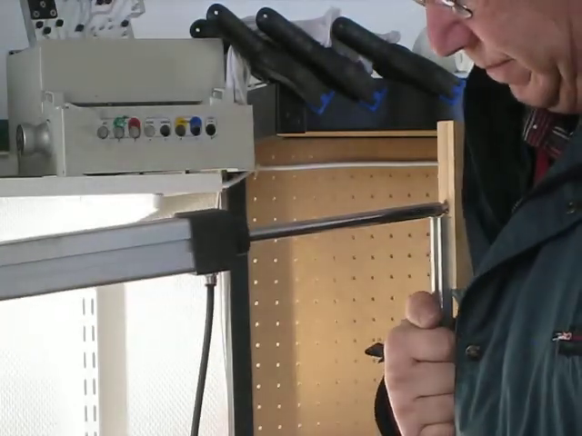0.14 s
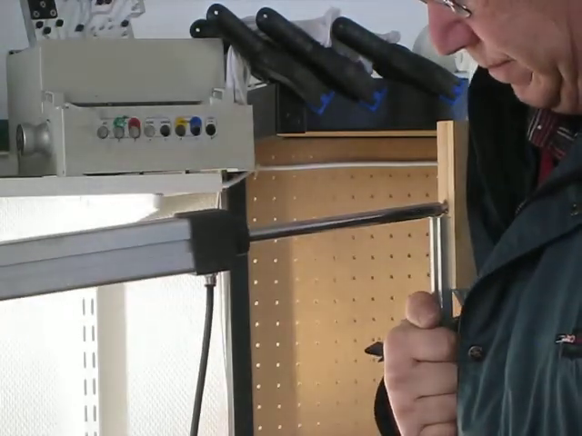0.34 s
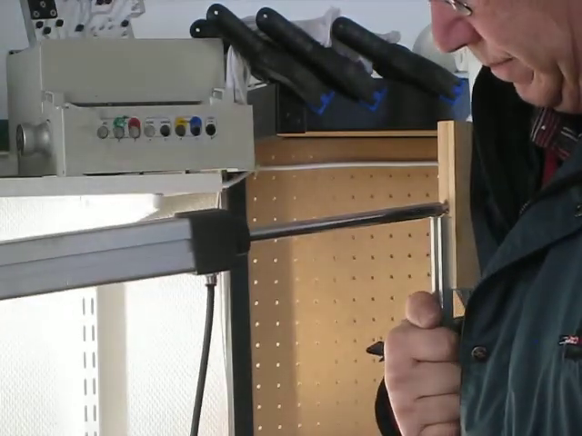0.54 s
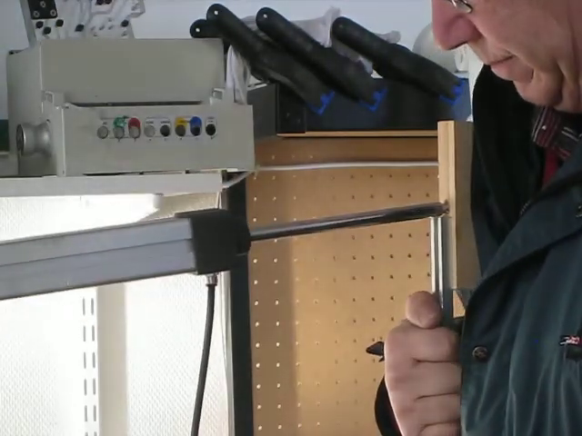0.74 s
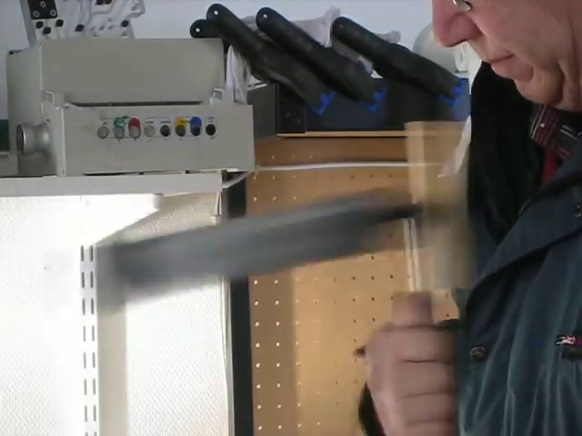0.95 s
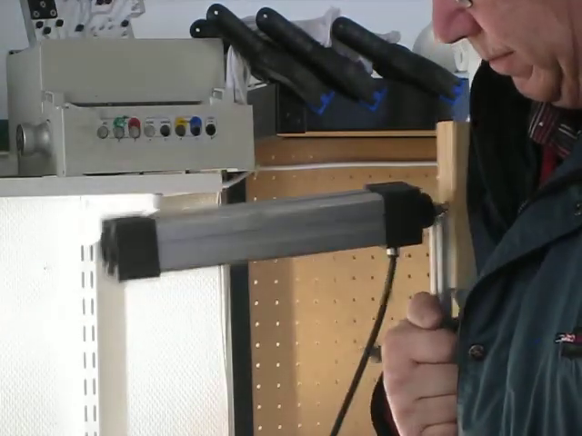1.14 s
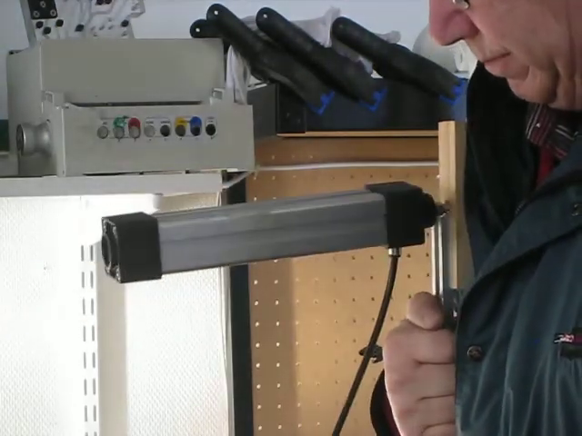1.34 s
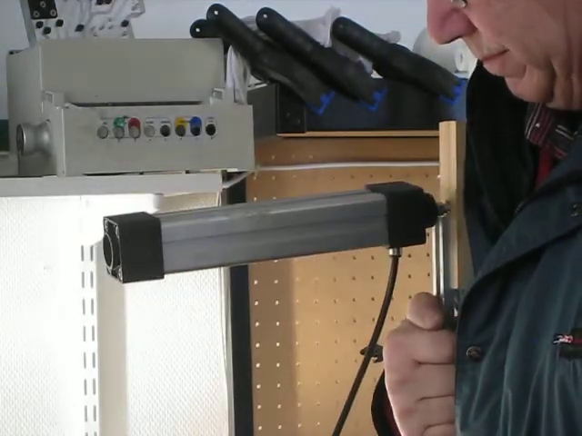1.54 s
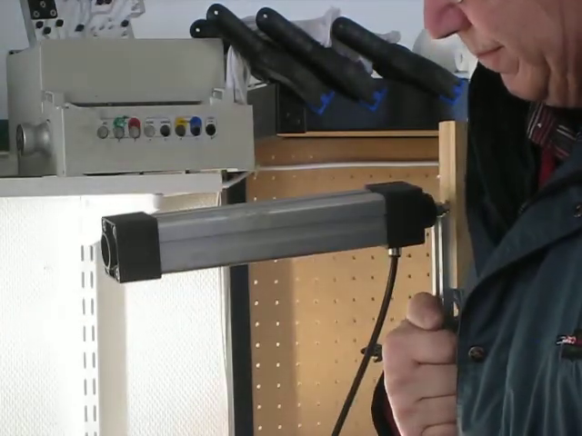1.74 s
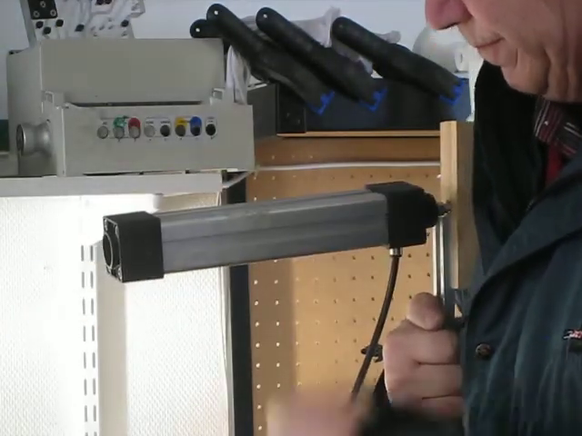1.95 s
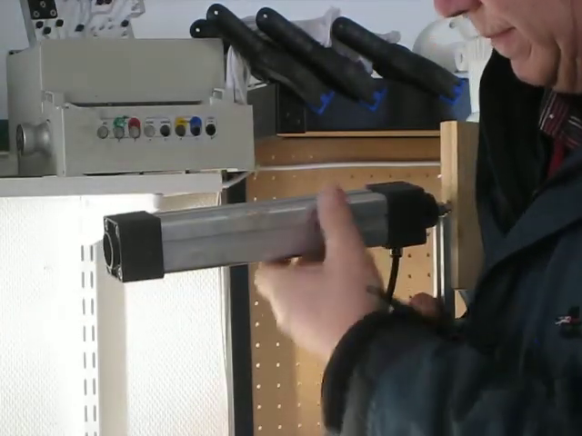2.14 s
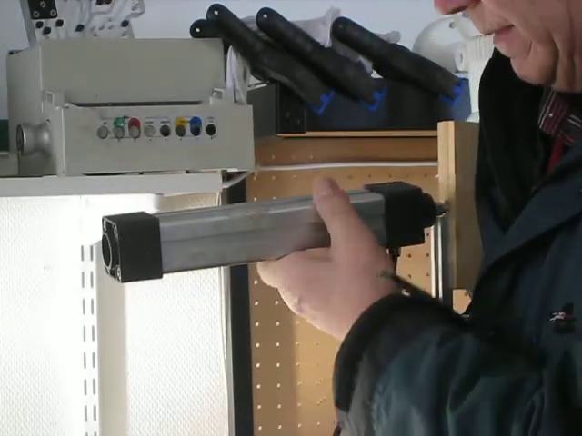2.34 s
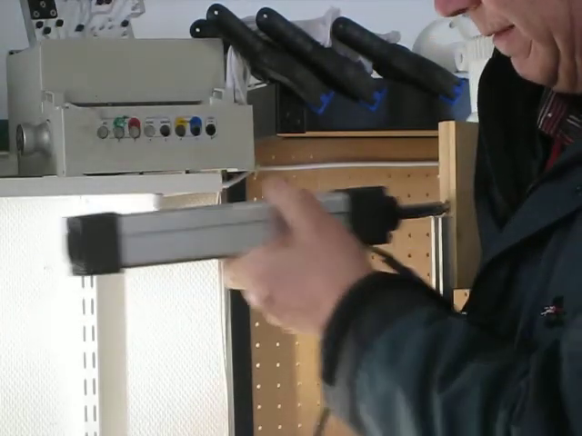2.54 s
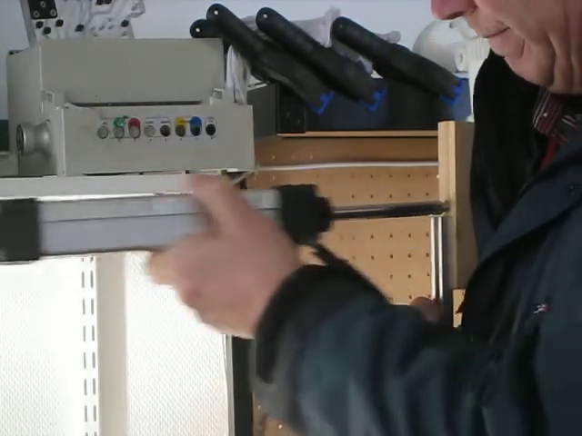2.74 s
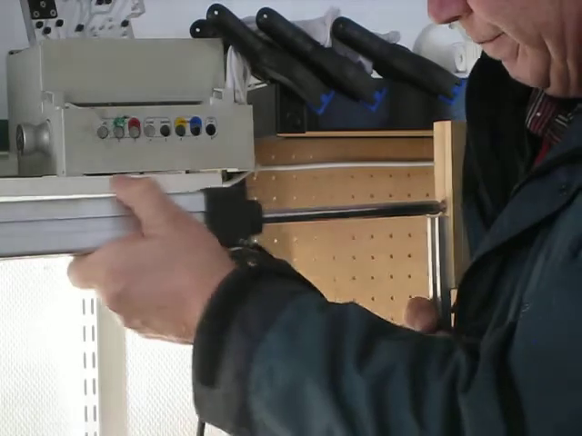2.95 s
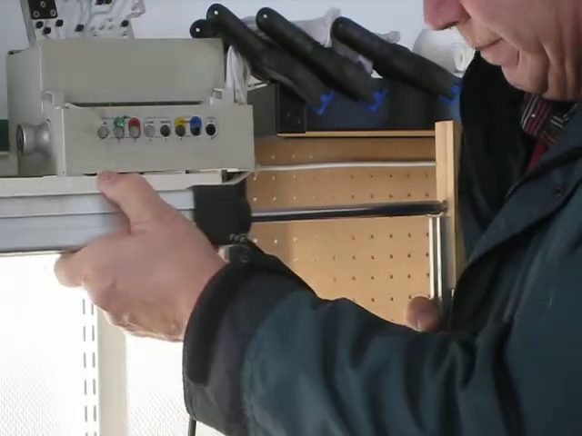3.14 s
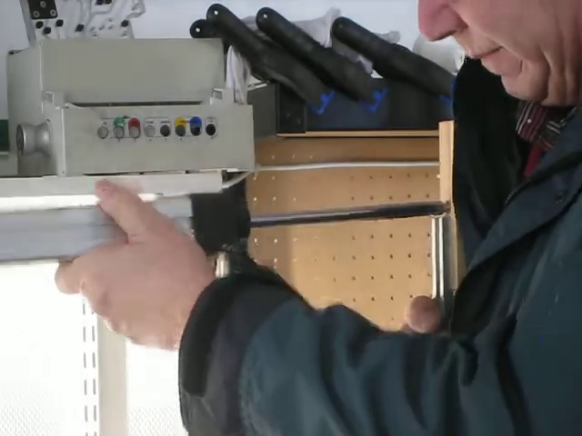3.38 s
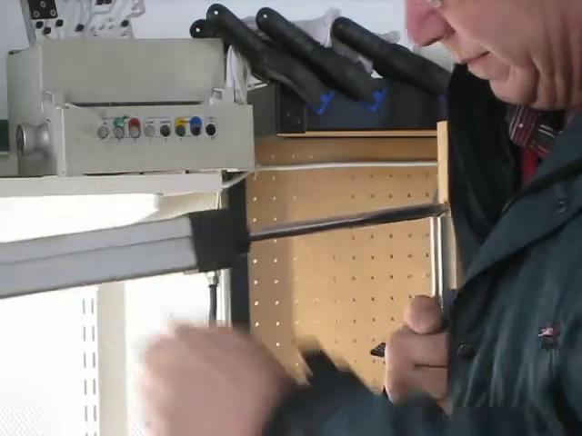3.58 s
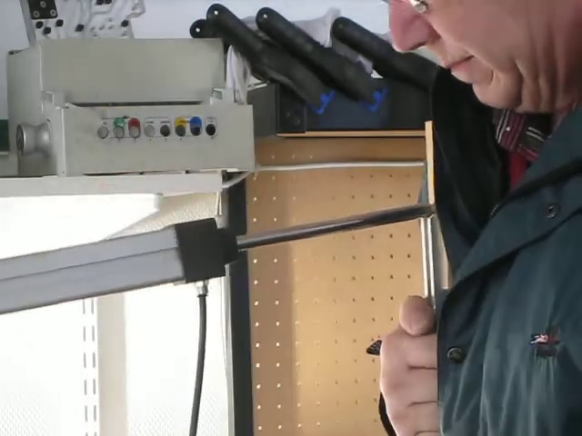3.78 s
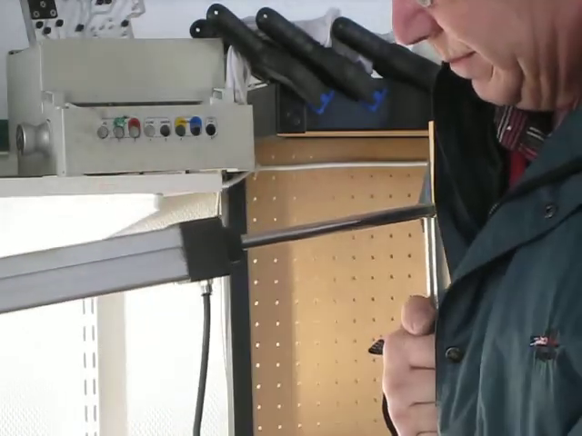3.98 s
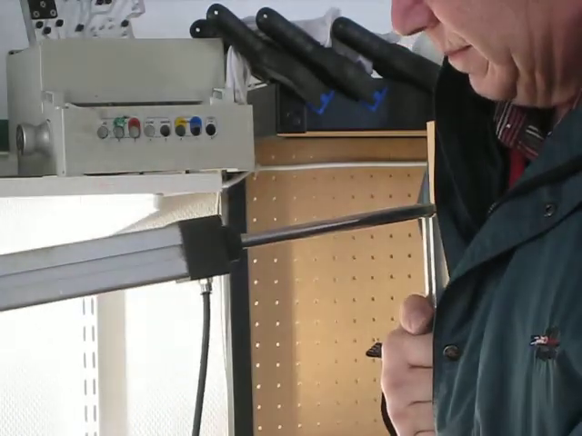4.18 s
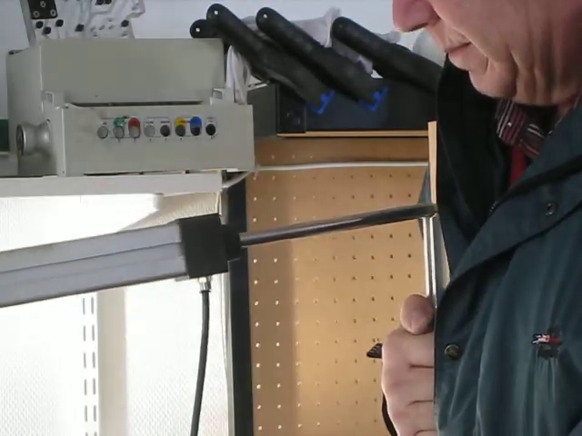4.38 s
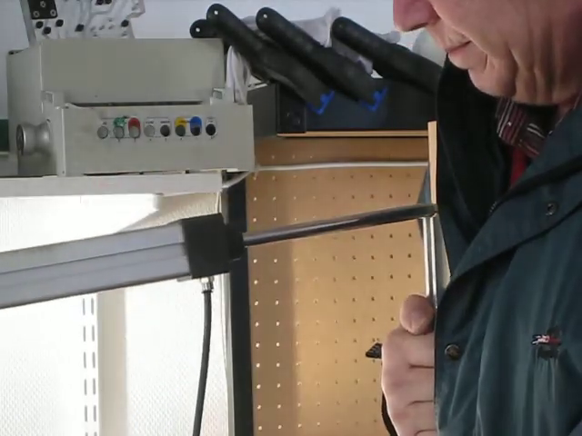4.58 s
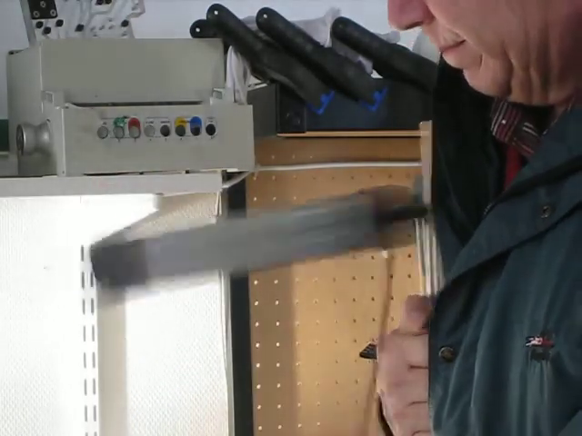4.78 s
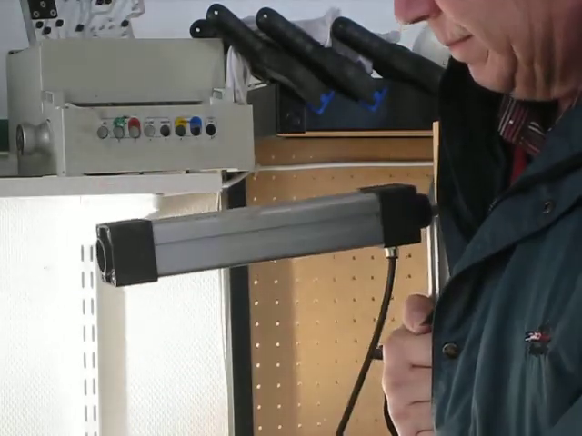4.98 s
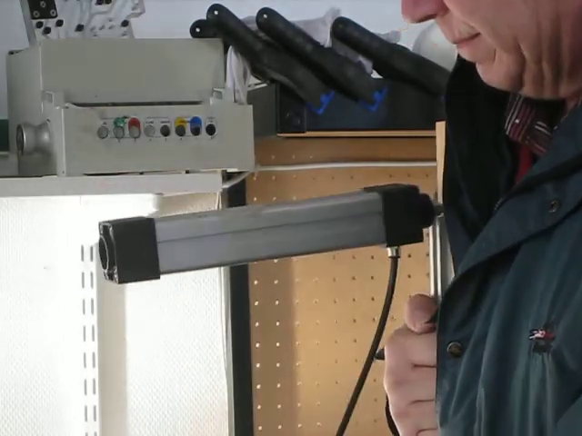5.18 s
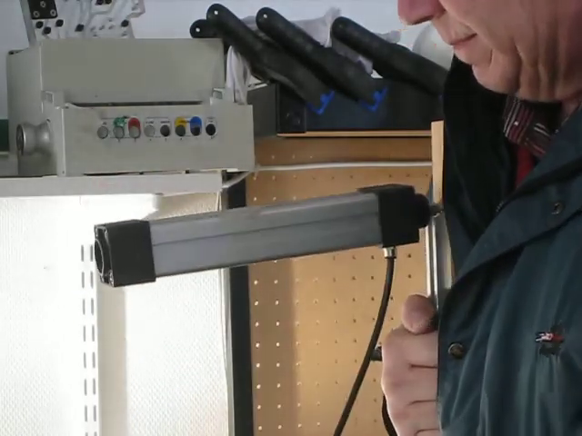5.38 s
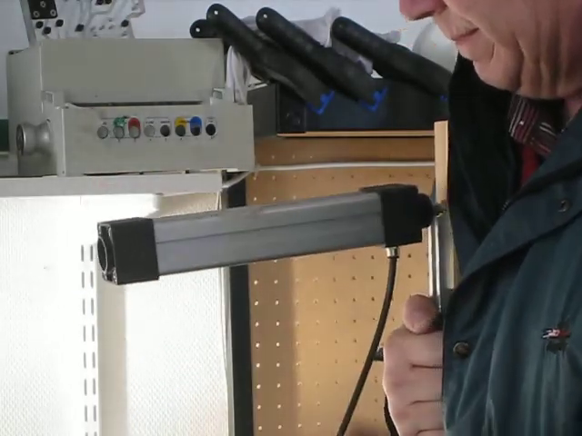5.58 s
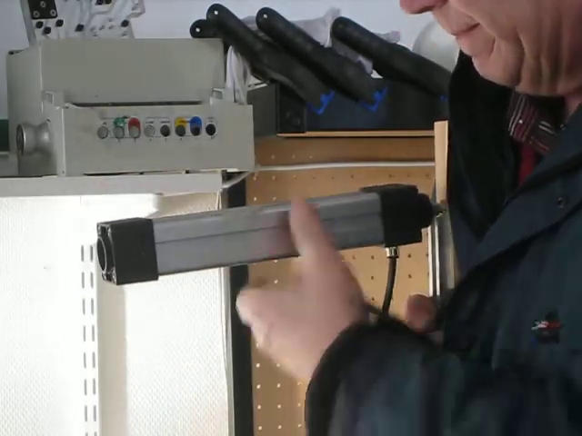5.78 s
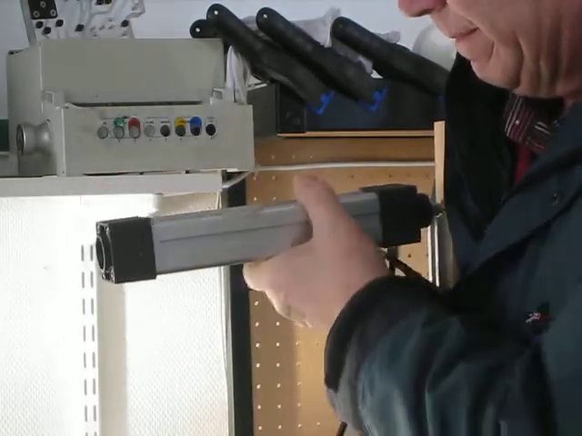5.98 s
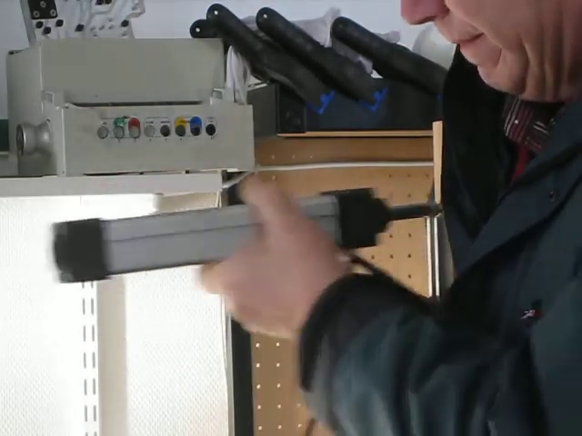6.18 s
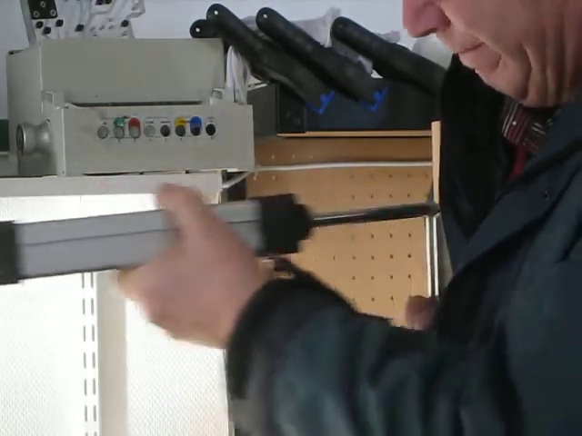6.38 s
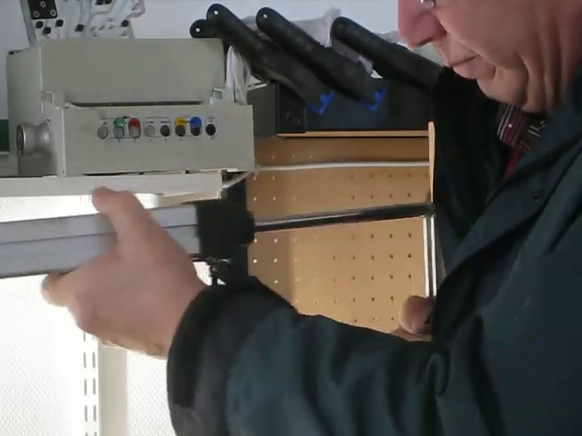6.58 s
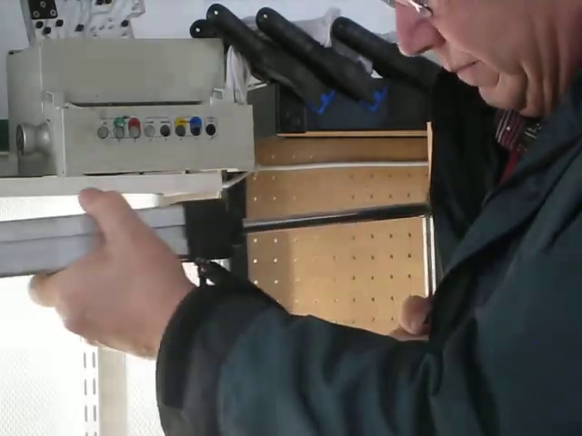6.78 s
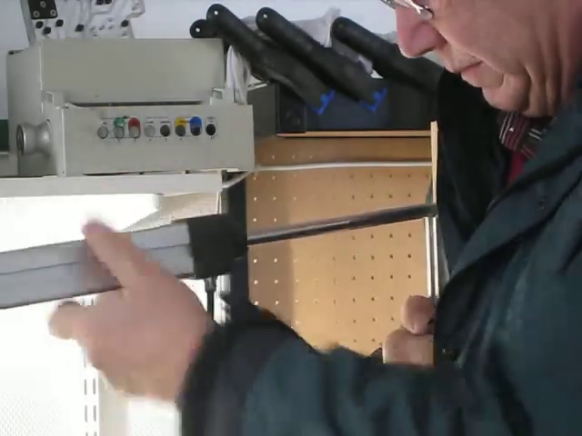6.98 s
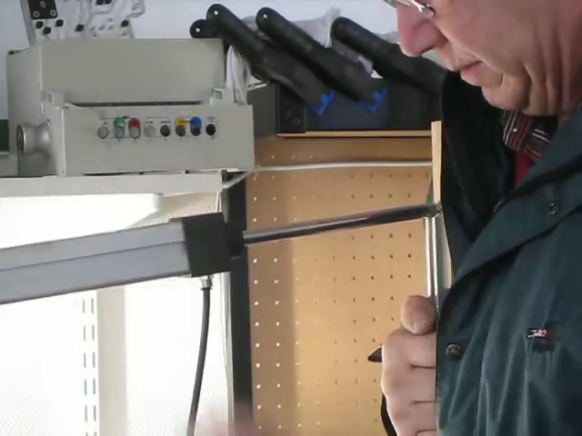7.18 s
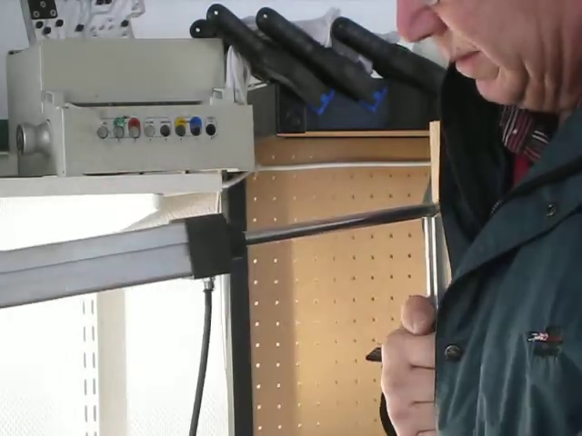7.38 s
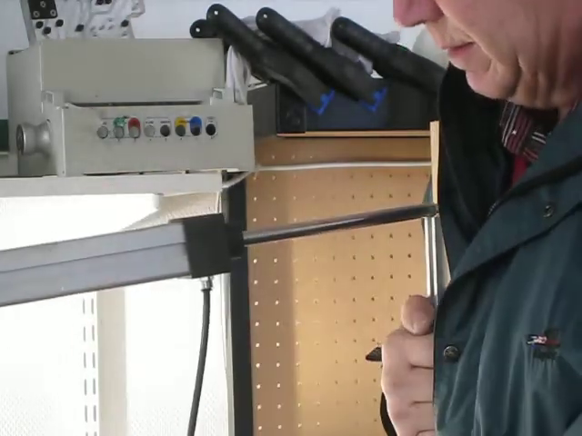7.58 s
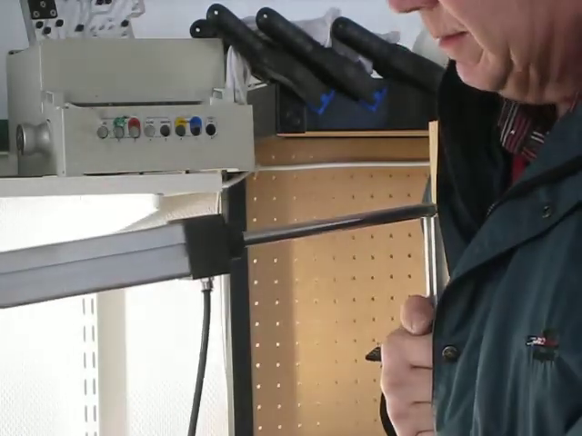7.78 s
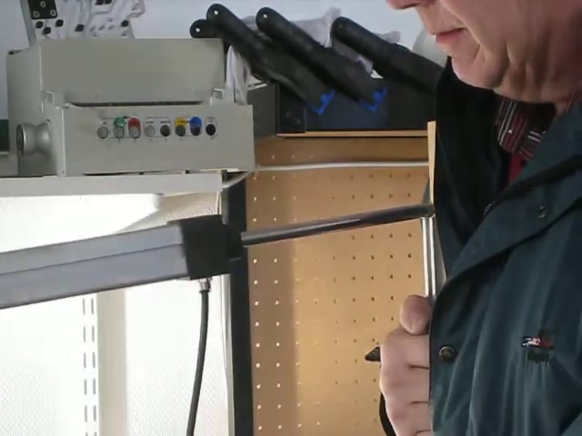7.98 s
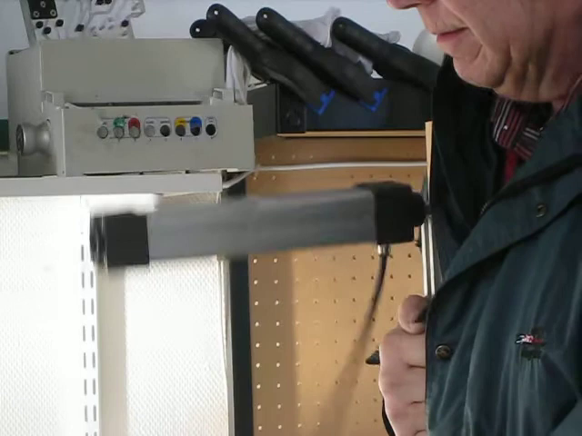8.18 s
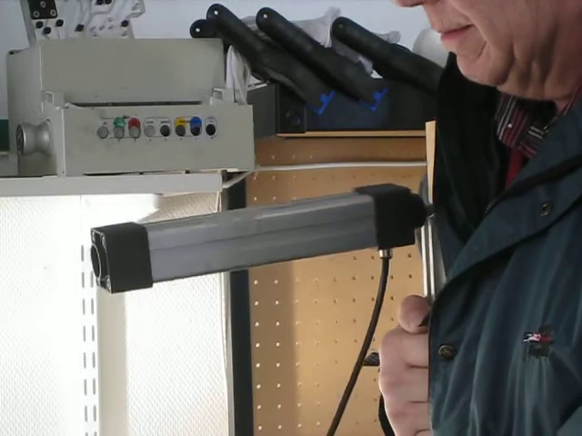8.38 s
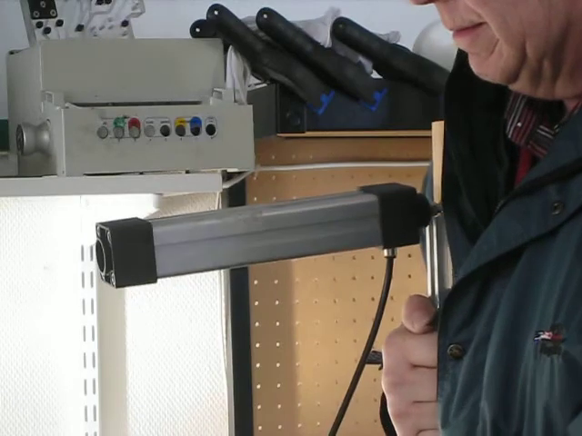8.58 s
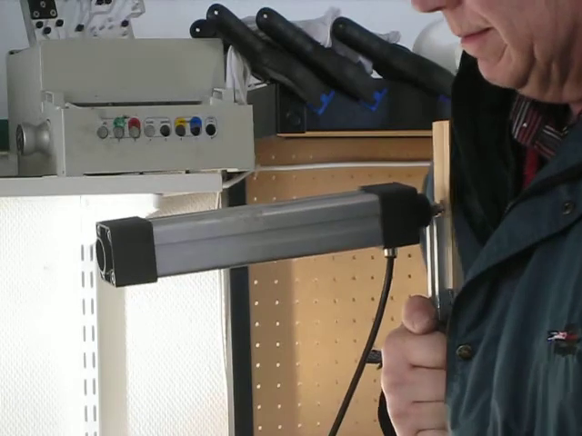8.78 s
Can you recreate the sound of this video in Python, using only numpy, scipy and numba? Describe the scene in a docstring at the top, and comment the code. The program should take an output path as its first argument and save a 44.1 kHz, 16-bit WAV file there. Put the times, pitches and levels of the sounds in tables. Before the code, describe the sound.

Three loud pneumatic strokes, near one microphone in a reverberant workshop: an instant crack and rush of air, a dull rebound, faint whistling, then about half a second later a pop and sharp hiss. Between the first and second, and second and third, cloth rubs, air is sucked quietly through a port, and small parts click. Quiet room air, motor hum and high whine continue underneath, with room sound swelling after each flattened blast.

```python
"""Workshop, one microphone. Three times a valve snaps open, air rushes into a pneumatic cylinder and the piston slams
its end cap; the port whistles as the barrel fills, and the first time the barrel chatters in its bracket.
The valve then dumps the air with a pop and a fading jet, and after the first two exhausts a hand draws the barrel out.
A sleeve rubs close by and small parts knock between strokes; a motor hum, a thin whine and workshop air run throughout.
The recorder's limiter flattens each blast and lets the room swell up behind it."""
import sys
import numpy as np
from scipy import signal
from scipy.fft import rfft, irfft, next_fast_len
from scipy.io import wavfile
from scipy.ndimage import map_coordinates
from numba import njit

SR = 44100
rng = np.random.default_rng(int(sys.argv[2]) if len(sys.argv) > 2 else 0)


def store_wav(level_fs):
    """Save 16-bit WAV to argv[1]."""
    pcm = np.round(np.clip(np.atleast_2d(level_fs), -1, 1) * 32767)
    wavfile.write(sys.argv[1], SR, pcm.T.astype(np.int16))


N = 389455
TIME = np.arange(N) / SR

# All levels below are relative source levels, ahead of the limiter.
# Power strokes: (slam time [s], slam level [dB], frame ring level [dB], valve snap time [s],
# inrush level [dB], inrush full time [s], inrush end time [s], whistle level [dB])
POWER_STROKES = [(0.8993, -2.5, -15, 0.883, -10, 0.91, 1.08, -30),
                 (4.7493, -5.5, -18, 4.7155, -10.5, 4.750, 4.89, -38),
                 (8.0349, -3.5, -12.5, 8.022, -10.5, 8.077, 8.177, -38)]
# Room's answer to piston on end cap: (frequency [Hz], level [dB])
THUD_SPECTRUM = [(40, -55), (90, -23), (140, -13.5), (300, -7.5), (500, -2.5), (680, -0.5), (1050, -2.5),
                 (1400, -6.5), (2000, -9.5), (2800, -13.5), (4000, -20.5), (7000, -16.5), (11000, -18),
                 (15500, -46)]
# Short, dead modes of the end cap: (frequency [Hz], level [dB], T60 [s])
CAP_MODES = [(463, -21.5, 0.067), (798, -5.5, 0.034), (1130, 2, 0.0099), (1373, -5.5, 0.024),
             (2066, -4, 0.0089), (4210, -35, 0.0031), (4880, -7, 0.011)]
# Modes of barrel and mount: (frequency [Hz], level [dB])
FRAME_MODES = [(140, -15.5), (222, -8), (421, 2.5), (612, 0.5), (659, 0.5), (722, -4), (799, 2), (852, -2),
               (897, -13), (1028, -10), (1093, -1), (1275, 2)]
# Air rushing into the barrel: (frequency [Hz], level [dB])
INRUSH_SPECTRUM = [(60, -58), (300, -8), (1500, -3), (2600, -3), (3800, -5), (6000, -3.5), (8000, -1.5),
                   (10500, -6.5), (12800, -8), (15500, -13)]
# Edge tones of the filling port: (multiple of the lowest tone [ratio], level [dB])
WHISTLE_TONES = [(1, -46), (1.009, -47), (1.072, -50), (1.189, -55)]
# Lowest whistle tone of each stroke: (frequency [Hz])
WHISTLE_PITCHES = [6350, 6900, 6430]
# Mount chattering as the barrel swings out: (time [s], level [dB])
CHATTER_KNOCKS = [(1.21, -33), (1.278, -34.5), (1.315, -33), (1.388, -37), (1.435, -39.5), (1.548, -45),
                  (1.635, -42.5)]
# Ringing bracket: (frequency [Hz], level [dB], T60 [s])
BRACKET_MODES = [(231.7, -15.5, 0.24), (614.4, -4, 0.69), (647, -18, 0.34), (888, -19, .3), (1110, -21, .3),
                 (1244, -11, 0.3)]
# Exhausts: (time [s], pop level [dB], hiss level [dB], time until the barrel is empty [s])
EXHAUST_EVENTS = [(1.698, -8.5, -9.5, .30), (5.342, -8.5, -8.5, .30), (8.7380, -10.5, -6, .30)]
# Pop of the opening exhaust: (frequency [Hz], level [dB])
POP_SPECTRUM = [(60, -8.5), (300, -5), (1200, -3.5), (2200, 7.5), (5000, 10), (7000, -1.5), (15000, -8.5)]
# Exhaust jet at full pressure: (frequency [Hz], level [dB])
JET_SPECTRUM = [(200, -50), (700, -35), (1000, -22), (1600, -12.5), (2300, -6), (3300, -4), (5200, -0.5),
                (7000, -10.5), (8400, -3.5), (10200, -9.5), (13000, -6.5), (15500, -5)]
# Exhaust when nearly empty: (frequency [Hz], level [dB])
SPENT_SPECTRUM = [(60, -27), (500, -23.5), (850, -11), (1200, -5), (2200, -3), (3200, 5), (3900, -0.5),
                  (4600, 3.5), (5400, -2.5), (6600, -16), (8000, -11.5), (10500, -26.5), (14500, -35),
                  (15600, -2)]
# High resonances of the exhaust hose: (frequency [Hz], width [Hz], level [dB])
HOSE_PEAKS = [(8780, 570, 16), (13350, 890, 24)]
# Barrel drawn out by hand: (start time [s], end time [s], suction level [dB])
HAND_DRAWS = [(2.447, 2.916, -45), (6.046, 6.513, -43)]
# Air drawn through the port: (frequency [Hz], level [dB])
PORT_SPECTRUM = [(290, -45), (500, -22), (628, -8), (896, -8), (1110, -3), (2290, -6), (3000, -3),
                 (5860, -14.5), (11000, -15), (15000, -21)]
# Resonances of the port: (frequency [Hz], width [Hz], level [dB])
PORT_RESONANCES = [(1070, 230, 5), (3230, 880, 8), (4600, 490, 6.5)]
# Piston touching its outer stop: (time [s], level [dB])
STOP_TOUCHES = [(2.897, -33), (6.490, -33.5)]
# Tap on the outer stop: (frequency [Hz], level [dB])
STOP_SPECTRUM = [(100, -10), (300, 2.5), (1200, 1.5), (3200, 2.5), (5000, -4), (6300, -1.5), (8500, -13),
                 (10200, 1.5), (11200, -10), (12800, -11), (15500, -17)]
# Mount taking up the stop: (frequency [Hz], level [dB])
THUMP_SPECTRUM = [(100, -23), (230, 0), (500, -5), (1200, -5), (3000, -30)]
# Light knocks of pivot and valve handle: (time [s], level [dB], treble edge [Hz])
LIGHT_KNOCKS = [(1.365, -44, 6000), (3.578, -41.5, 6000), (3.592, -46, 4000), (3.677, -47, 2500),
                (4.06, -43, 2800), (4.491, -44, 2000), (6.70, -43, 500), (7.06, -43, 2500),
                (7.092, -36, 5000), (7.85, -45.5, 1500)]
# Colour of a knock: (frequency [Hz], level [dB])
KNOCK_SPECTRUM = [(60, -24), (300, 5), (900, 4.5), (5000, 1.5), (6500, -16), (15000, -24)]
# Jacket sleeve as the arm reaches, pulls and lets go:
# (time of full speed [s], length [s], folds level [dB], smooth face level [dB])
SLEEVE_SWEEPS = [(2.414, .25, -51.5, -55), (2.83, 0.56, -51, -56), (3.274, 0.24, -50.5, -56),
                 (3.58, 0.56, -51.5, -55.5), (3.917, 0.3, -52, -50.5), (5.844, 0.34, -53, -48),
                 (6.25, 0.24, -64, -61), (6.603, 0.31, -53, -57), (7.08, 0.47, -52.5, -54.5),
                 (7.377, 0.28, -51.5, -52)]
# Rubbing folds of the sleeve: (frequency [Hz], level [dB])
FOLDS_SPECTRUM = [(60, -18), (300, -13), (1000, 4), (3000, -0.5), (6000, -8), (15500, -28)]
# Smooth face of the sleeve: (frequency [Hz], level [dB])
SWISH_SPECTRUM = [(1000, -26), (4000, 0.5), (8000, 0), (15500, -4.5)]
# Decay of the workshop: (frequency [Hz], T60 [s])
ROOM_DECAY = [(100, 0.71), (400, 0.37), (1000, 0.59), (3000, 0.48), (7000, 0.39), (15000, 0.12)]
# Steady hum of the motor: (frequency [Hz], level [dB])
HUM_TONES = [(48.4, -55.5), (99, -70)]
# Skirt of the high whine: (frequency [Hz], level [dB])
WHINE_SKIRT = [(9000, -60), (10300, -22), (10650, -17), (11100, -14), (11250, -21), (11600, -23),
               (12200, -60)]
# Line of the high whine: (frequency [Hz], width [Hz], level [dB])
WHINE_PEAK = [(11283, 70, 18)]
# Workshop air: (frequency [Hz], level [dB])
AIR_SPECTRUM = [(15, -16), (25, -2), (100, -2), (250, 1), (450, 1.5), (750, 1.5), (1100, -2.5),
                (2000, -5.5), (3000, -10), (6000, -13), (10000, -16), (12500, -18), (15500, -24.5)]


def amp(db):
    """Decibels to gain."""
    return 10 ** (np.asarray(db) / 20)


def unit(x):
    """Scales to rms 1."""
    return x / np.sqrt(np.mean(x ** 2) + 1e-20)


def read(points, hz):
    """Reads a spectrum on a log-frequency axis."""
    f, value = np.transpose(points)
    return np.interp(np.log(hz + 1), np.log(f + 1), value)


def colour(x, points, peaks=()):
    """Filters by a spectrum and resonances (Hz, width, dB), keeping the power of a white input."""
    size = next_fast_len(N, True)
    hz = np.fft.rfftfreq(size, 1 / SR)
    db = read(points, hz)
    for f, width, height in peaks:
        db = db + height / (1 + (2 * (hz - f) / width) ** 2)
    return irfft(rfft(x, size) * unit(amp(db)), size)[:N]


def noise(points, peaks=()):
    """Noise of rms 1 with a given spectrum and resonances."""
    return unit(colour(rng.standard_normal(N), points, peaks))


def drift(per_s):
    """Random wander of rms about 1 that forgets its value at the given rate."""
    knots = np.linspace(0, TIME[-1], 4000)
    memory = np.exp(-per_s * knots[1])
    wander = signal.lfilter([1], [1, -memory], rng.standard_normal(len(knots)))
    return np.interp(TIME, knots, unit(wander))


def burst(s, rise, t60):
    """Envelope that starts to rise at s and then dies away."""
    age = np.maximum(TIME - s, 0)
    decay = np.log(1000) * np.maximum(age - rise, 0) / t60
    return np.minimum(age / rise, 1) * np.exp(-np.minimum(decay, 20))


def ring(blows, modes, rise=0.0006):
    """Each blow (s, dB) sets decaying sine modes (Hz, dB, t60) ringing."""
    t = np.arange(SR) / SR
    out = np.zeros(N + SR)
    tone = np.zeros(SR)
    for k, (f, db, t60) in enumerate(modes):
        # neighbouring modes start in opposite polarity
        tone += (-1) ** k * amp(db - 60 * t / t60) * np.sin(2 * np.pi * f * t)
    for s, db in blows:
        out[round(s * SR):][:SR] += amp(db) * tone * np.minimum(t / rise, 1)
    return out[:N]


def room(x, build=0.0062, build_cycles=14):
    """Diffuse workshop tail of energy 1: each band dies at its own speed, and the bass is slow to build up."""
    hz, t, z = signal.stft(rng.standard_normal(SR), SR, nperseg=256)
    rising = np.minimum(t / (build + build_cycles / (hz[:, None] + 30)), 1)
    dying = amp(-60 * t / read(ROOM_DECAY, hz)[:, None])
    tail = signal.istft(z * rising * dying, SR, nperseg=256)[1]
    return signal.fftconvolve(x, tail / np.linalg.norm(tail))[:N]


def slams(cap_db=9, rebound_s=0.00373, rebound_db=15, crack_db=-4, room_db=29, ring_t60=0.45):
    """The piston cracks against the end cap and lands again more dully; frame and room ring on."""
    blows = [(s, db) for s, db, *_ in POWER_STROKES]
    first = signal.lfilter(*signal.butter(2, 350, "high", fs=SR), ring(blows, CAP_MODES))
    dulled = signal.lfilter(*signal.butter(1, 1200, fs=SR), first)
    second = np.interp(TIME - rebound_s, TIME, dulled)
    crack_noise = noise([(200, -35), (1500, 11.5), (5000, -3), (11000, -5.5), (15500, -34)])
    crack = sum(amp(db) * burst(s, 0.00024, 0.041) for s, db in blows) * crack_noise
    direct = amp(cap_db) * first + amp(rebound_db) * second + amp(crack_db) * crack
    # barrel and mount ring on much longer than the cap
    frame_blows = [(s, ring_db) for s, _, ring_db, *_ in POWER_STROKES]
    frame = ring(frame_blows, [(f, db, ring_t60) for f, db in FRAME_MODES], rise=0.0058)
    clicks = np.zeros(N)
    for s, db in blows:
        clicks[round(s * SR)] = amp(db)
    return direct + frame + amp(room_db) * room(colour(clicks, THUD_SPECTRUM))


def inrush(snap_db=-33, swell_db=28, fall_db_per_s=95, room_db=-4, flutter_db=3.5, onset_offset=.012):
    """The valve snaps open, the flow swells, then fades as the barrel fills and the port starts to whistle."""
    valve_s, settle_s = 0.011, .1  # valve opening, settling of the filled barrel
    gap_open, gap_filled, gap_left = 0.79, .22, 0.056  # pressure across the port [share of supply]
    lead_s, whistle_rise_s, whistle_t60, offset_decay_s = .03, 0.016, 0.46, 0.01205
    flow, snap, edge, lowest_hz = np.zeros((4, N))
    for (*_, opens, db, full, ends, whistle_db), whistle_hz in zip(POWER_STROKES, WHISTLE_PITCHES):
        shape_db = np.interp(TIME, [opens, full, full + 1], [-swell_db, 0, -fall_db_per_s])
        gap_times = [opens - valve_s, opens, ends, ends + settle_s]
        pressure_gap = np.interp(TIME, gap_times, [0, gap_open, gap_filled, gap_left])
        flow += amp(db + shape_db) * pressure_gap
        snap += burst(opens, 0.00037, 0.21)
        # the whistle starts just before the barrel is full and holds a nearly steady pitch
        starts = ends - lead_s
        edge += amp(whistle_db) * burst(starts, whistle_rise_s, whistle_t60)
        offset = onset_offset * np.exp(-np.maximum(TIME - starts, 0) / offset_decay_s)
        lowest_hz = np.where(TIME > opens, whistle_hz * (1 + offset), lowest_hz)
    valve = noise([(100, -45), (800, -9), (2500, -5), (10000, -3), (15000, -12)],
                  [(2520, 460, 21), (6370, 400, 9.0), (7700, 400, 8.5)])
    rush = noise(INRUSH_SPECTRUM, [(7600, 970, 3), (12500, 820, 3.7)])
    air = flow * rush * amp(flutter_db * drift(92)) + amp(snap_db) * snap * valve
    tones = np.zeros(N)
    for multiple, db in WHISTLE_TONES:
        hz = multiple * lowest_hz * (1 + 0.00213 * drift(137))
        tones += amp(db + 3.5 * drift(99.6)) * np.sin(2 * np.pi * np.cumsum(hz) / SR)
    return air + amp(room_db) * room(air) + edge * unit(tones)


def chatter(rattle_db=-3, room_db=0):
    """The swinging barrel knocks about in its bracket: ringing modes and short noise bursts."""
    knocks = sum(amp(db) * burst(s, 0.0014, 0.098) for s, db in CHATTER_KNOCKS)
    rattle_noise = noise([(60, -40), (200, -9), (450, 2.0), (620, 4.5),
                          (900, 5), (1280, 0.0), (1700, -14), (6000, -29)])
    rattle = amp(rattle_db) * knocks * rattle_noise
    return ring(CHATTER_KNOCKS, BRACKET_MODES) + rattle + amp(room_db) * room(rattle)


def exhausts(fall_db_per_s=50, opening=0.013, shut_t60=0.064, mellow_s=.14, glide=.08, room_db=-1,
             flutter_db=1.3, bleed_db=-31, bleed_t60=1.5):
    """A pop, then a jet that weakens with pressure and gives way to hose resonances; the last air bleeds off."""
    pop, jet, spent, bleed, sharp = np.zeros((5, N))
    for s, pop_db, db, lasts in EXHAUST_EVENTS:
        age = np.maximum(TIME - s, 0)
        shut_db = 60 * np.clip(age - lasts, 0, 1) / shut_t60
        flow = amp(db - fall_db_per_s * age - shut_db) * np.minimum(age / opening, 1)
        pressure = np.exp(-(age / mellow_s) ** 2) * (TIME > s)
        pop += amp(pop_db) * burst(s, 0.0034, 0.1) ** 2
        # crossfade at equal power
        jet += flow * np.sqrt(pressure)
        spent += flow * np.sqrt(1 - pressure)
        sharp += glide * np.sqrt(pressure)
        bleed += amp(bleed_db) * burst(s, 0.035, bleed_t60)
    # the expanding air cools, so the hose resonances sink: the noise is read ever more slowly
    hose = map_coordinates(noise(SPENT_SPECTRUM, HOSE_PEAKS), [np.cumsum(1 + sharp)], order=3, mode="wrap")
    air = (jet * noise(JET_SPECTRUM) + spent * hose) * amp(flutter_db * drift(113))
    last_air = bleed * noise([(200, -19.5), (1500, 4), (4500, -2.5), (9000, -4), (15500, -9)])
    return pop * noise(POP_SPECTRUM) + air + amp(room_db) * room(air) + last_air


def suction(rasp_db=1.35, rasp_per_s=400, unsteady_db=.9, unsteady_per_s=30, rise_s=.08, t60=0.11):
    """Air is sucked through the port while the hand pulls; the seal rasps along the bore."""
    flow = np.zeros(N)
    for start, end, db in HAND_DRAWS:
        # the hand gets up to speed; the suction dies away once the barrel stops
        speed = np.clip((TIME - start) / rise_s, 0, 1)
        flow += amp(db) * speed * amp(-60 * np.clip(TIME - end, 0, 1) / t60)
    wander_db = rasp_db * drift(rasp_per_s) + unsteady_db * drift(unsteady_per_s)
    return flow * noise(PORT_SPECTRUM, PORT_RESONANCES) * amp(wander_db)


def taps(stop_t60=0.062, knock_t60=0.044, rise_s=0.00077, thump_db=-10, thump_rise_s=0.015, thump_t60=.2):
    """The piston touches its outer stop and the mount thumps more slowly; pivot and valve handle knock lightly."""
    touch = sum(amp(db) * burst(s, rise_s, stop_t60) for s, db in STOP_TOUCHES)
    thump = sum(amp(db + thump_db) * burst(s, thump_rise_s, thump_t60) for s, db in STOP_TOUCHES)
    out = noise(STOP_SPECTRUM) * touch + noise(THUMP_SPECTRUM) * thump
    knock = noise(KNOCK_SPECTRUM)
    for s, db, edge_hz in LIGHT_KNOCKS:
        softened = signal.lfilter(*signal.butter(2, min(edge_hz, SR / 3), fs=SR), knock)
        out += amp(db) * burst(s, rise_s, knock_t60) * unit(softened)
    return out


def sweep(s, length, ease=0.97):
    """Envelope of one arm movement: a half sine to the power ease that speeds up, peaks at s and slows down."""
    return np.maximum(np.cos(np.pi * np.clip((TIME - s) / length, -1, 1)), 0) ** ease


def sleeve(folds_db=-2, swish_db=-1, crumple_db=0.1, crumple_per_s=120):
    """With each sweep of the arm the folds rub unevenly and the smooth cloth swishes."""
    rub = sum(amp(folds_db + db) * sweep(s, length) for s, length, db, _ in SLEEVE_SWEEPS)
    swish = sum(amp(swish_db + db) * sweep(s, length) for s, length, _, db in SLEEVE_SWEEPS)
    folds = rub * noise(FOLDS_SPECTRUM) * amp(crumple_db * drift(crumple_per_s))
    return folds + swish * noise(SWISH_SPECTRUM)


def handling(room_db=-5):
    """The quiet work between strokes: suction and taps with their room sound, and the sleeve close by, dry."""
    work = suction() + taps()
    return work + amp(room_db) * room(work) + sleeve()


def background(whine_db=-66.5, air_db=-51.5):
    """Workshop air, a motor's hum of wandering sines, and a thin high whine with a fuzzy skirt below it."""
    hum = np.zeros(N)
    for f, db in HUM_TONES:
        wandering_hz = f + 0.29 * drift(5.6)
        hum += amp(db) * np.sqrt(2) * np.sin(2 * np.pi * np.cumsum(wandering_hz) / SR)
    whine = amp(whine_db) * noise(WHINE_SKIRT, WHINE_PEAK)
    air = amp(air_db) * noise(AIR_SPECTRUM) * amp(0.73 * drift(11.0))
    return hum + whine + air


def scene():
    """Everything at one microphone."""
    return (slams() + inrush() + chatter() + exhausts() + handling() + background())[None]


@njit
def follow(over_db, attack, release):
    """Gain reduction that climbs quickly to each excess and sinks back steadily."""
    out, held = np.zeros(len(over_db)), 0.
    for i in range(len(over_db)):
        if over_db[i] > held:
            held = held + attack * (over_db[i] - held)
        else:
            held = max(held - release, 0.)
        out[i] = held
    return out


def record(dry, limit_db=-17.0, attack_s=0.0034, release_db_per_s=170, treble_weight=1.003,
           ceiling=.72, edge_hz=15780):
    """A limiter, keener on treble, that lets the first milliseconds through to clip; then the band limit."""
    x = dry[0]
    # the sample-to-sample difference grows with frequency
    sensed = np.hypot(x, treble_weight * np.diff(x, prepend=0))
    over_db = 20 * np.log10(sensed + 1e-9) - limit_db
    cut_db = follow(over_db, 1 / (attack_s * SR), release_db_per_s / SR)
    held = x * amp(-cut_db)
    clipped = held / (1 + (held / ceiling) ** 4) ** .25
    lowpass = signal.firwin(511, edge_hz, window=("kaiser", 9), fs=SR)
    return signal.oaconvolve(clipped, lowpass, "same")[None]


dry = scene()
out = record(dry)
store_wav(out)
```